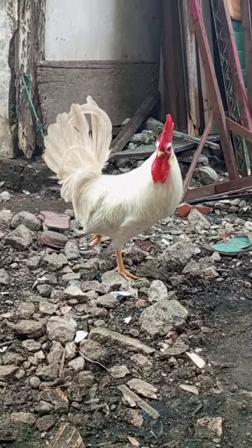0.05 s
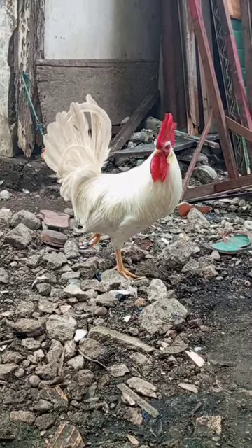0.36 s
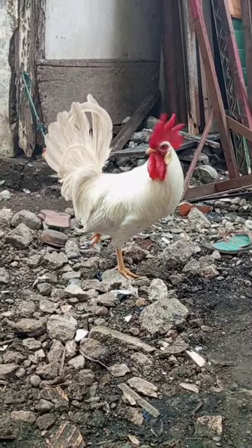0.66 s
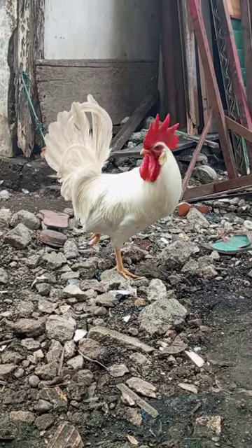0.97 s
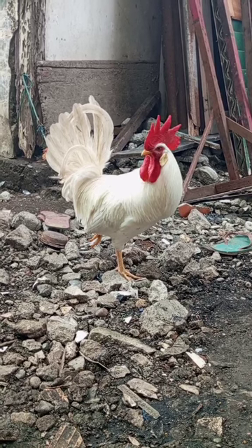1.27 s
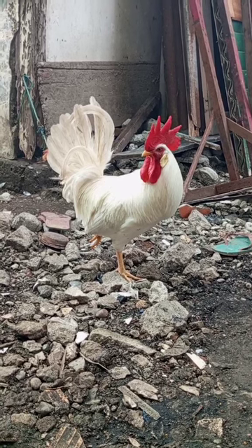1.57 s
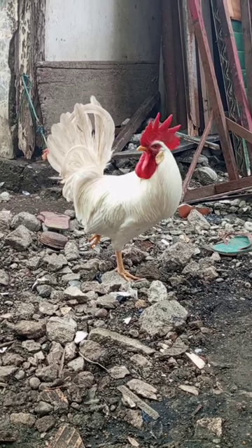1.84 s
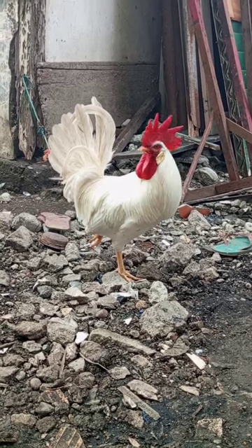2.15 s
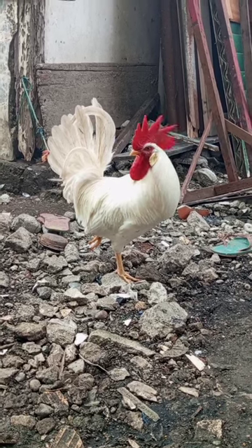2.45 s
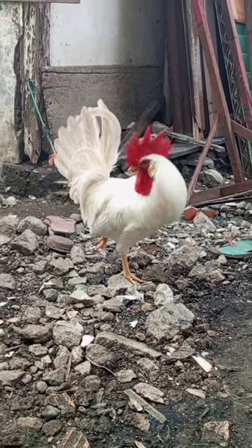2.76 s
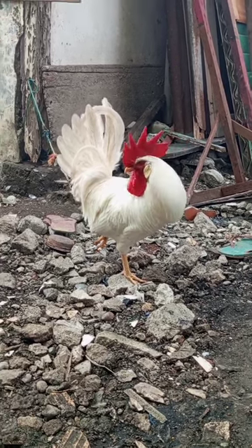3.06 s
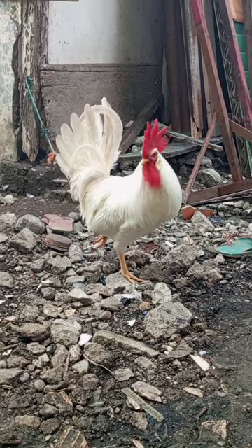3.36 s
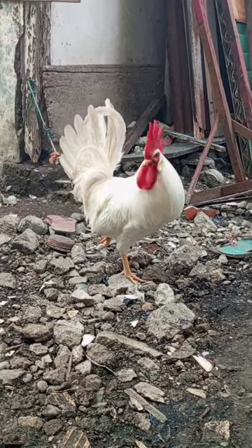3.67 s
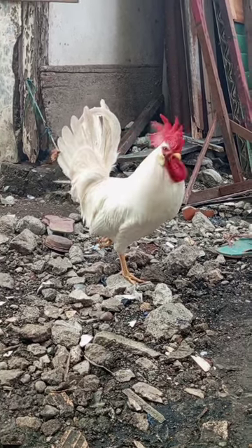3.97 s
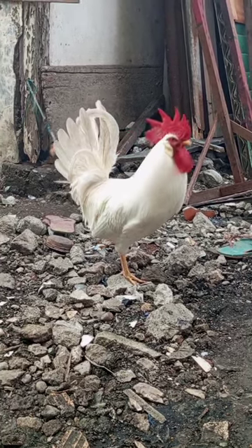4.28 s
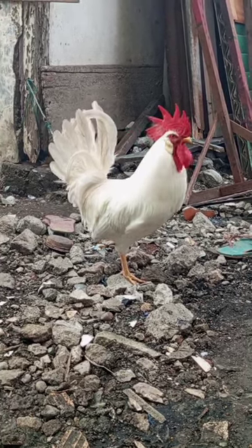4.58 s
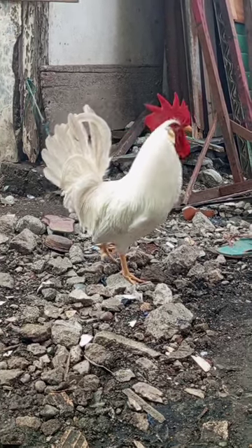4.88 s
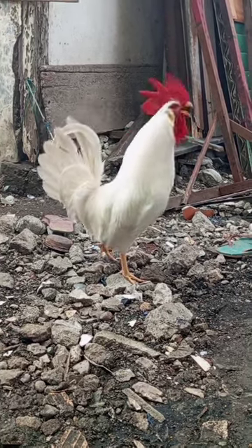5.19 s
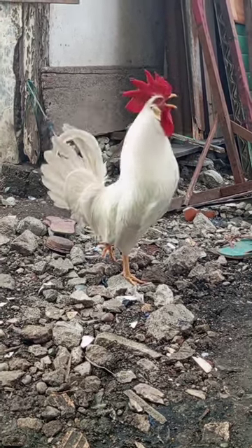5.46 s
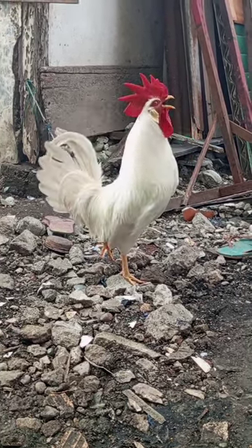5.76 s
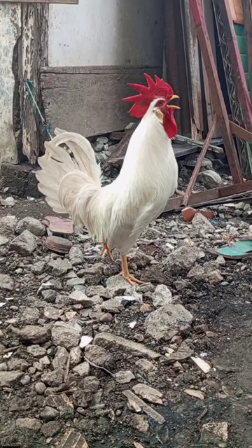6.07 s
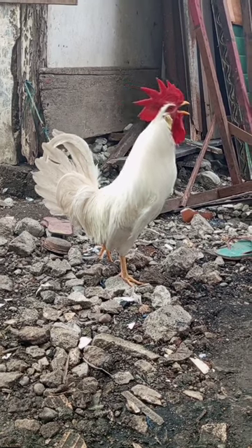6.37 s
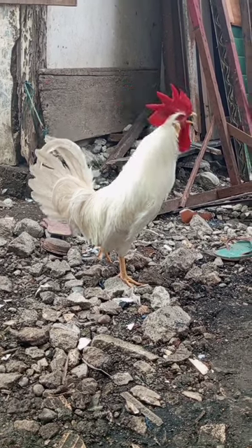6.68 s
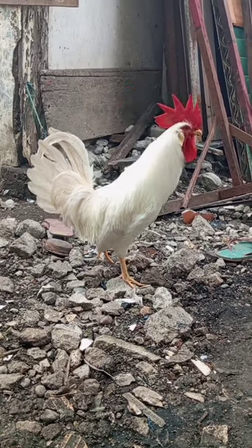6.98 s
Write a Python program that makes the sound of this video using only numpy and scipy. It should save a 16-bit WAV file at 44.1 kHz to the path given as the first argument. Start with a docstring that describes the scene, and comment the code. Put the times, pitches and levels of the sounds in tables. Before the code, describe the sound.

A rooster crows once, loud and raspy, after several seconds of faint bird chirps in a quiet yard.

```python
"""Rooster in a small walled yard

One crow from two metres: two short notes and a long falling one. The syrinx flips between a locked,
brassy tone and a chaotic rasp while the beak opens and closes; the walls ring briefly. Before it a small
bird chips, a far bird repeats a call and gravel scuffs, over an engine behind the houses and soft air."""
import sys
import numpy as np
from scipy import signal
from scipy.fft import rfft, irfft
from scipy.io import wavfile
from scipy.ndimage import uniform_filter1d

SR = 44100
rng = np.random.default_rng(int(sys.argv[2]) if len(sys.argv) > 2 else 0)


def wav_out(sig):
    """Save sig, one row per channel (or a flat mono array), as 16-bit PCM at SR to the path in sys.argv[1]."""
    wavfile.write(sys.argv[1], SR, np.round(np.clip(np.atleast_2d(sig).T, -1, 1) * 32767).astype(np.int16))


N = 314433
T = np.arange(N) / SR

# holds of the five throat and beak postures: start_s, end_s
POSTURE_HOLDS = [(5.36, 5.58), (5.68, 5.73), (5.81, 6.15), (6.3, 6.58), (6.75, 7.0)]


def rooster(attack_s=0.0073, release_s=0.023, treble_hz=4000, rasp_treble_db=-8.5, flutter_db=1.0):
    """Three syrinx notes; roughness splits each between rasp and the louder locked tone."""
    # notes: start_s, end_s, rasp_db, lock_gain_db, min_roughness (0-1)
    notes = [(5.355, 5.581, -21, 5, 0.11), (5.657, 5.732, -20.5, 6, 0), (5.784, 6.965, -20, 1.3, 0.04)]
    # pitch contour, one list per note: time_s, pitch_hz
    contours = [
        [(5.357, 736), (5.407, 685.2), (5.425, 835), (5.462, 829.2), (5.56, 865.7)],
        [(5.663, 833), (5.691, 969.3), (5.706, 976), (5.736, 871.2)],
        [(5.79, 795), (5.84, 896.1), (6.14, 876.8), (6.24, 889.8), (6.42, 899.2), (6.56, 887.9), (6.70, 865.3),
         (6.79, 832.2), (6.95, 814.7)],
    ]
    # treble share of the tone, per posture: share_db
    posture_treble_db = [-13.5, -13, -5, -1.63, -14.5]
    starts_s, _, *columns = np.transpose(notes)
    note = np.maximum(np.searchsorted(starts_s, T) - 1, 0)
    rasp_db, lock_gain_db, min_rough = [c[note] for c in columns]
    rough = roughness(min_rough)
    # breath gives out: the voice drops, fades and dulls
    collapse_s = np.maximum(T - 6.951, 0)
    drop_hz_per_s, fade_db_per_s, dull_db_per_s, floor_hz = 5500, 151, 200, 614
    hz = np.maximum(curves(np.vstack(contours))[0] - drop_hz_per_s * collapse_s, floor_hz)
    level_db = rasp_db + lock_gain_db * (1 - rough) - fade_db_per_s * collapse_s
    level_db += flutter_db * rough * wander(64)
    voice = np.sqrt(1 - rough ** 2) * locked_tone(hz, rough) + rough * rasp(hz) + membrane_whistle()
    # wider beak, more treble
    tone_treble_db = sum(w * db for w, db in zip(blend(POSTURE_HOLDS), posture_treble_db))
    share_db = rough * rasp_treble_db + (1 - rough) * tone_treble_db - dull_db_per_s * collapse_s
    share = np.clip(undb(share_db), 0, .95)
    treble = colour(voice, [(treble_hz * .93, -60), (treble_hz, 0)])
    voice = np.sqrt(1 - share ** 2) * steady(voice - treble) + share * steady(treble)
    gate = sum(np.clip((T - start_s) / attack_s, 0, 1) ** 2 * release(end_s, release_s)
               for start_s, end_s, *_ in notes)
    return band(voice * gate, 585, "high", order=8) * undb(level_db)


def roughness(rough, onset_share=.64, end_share=.48, flip_s=.014):
    """Raise the given roughness in bouts: the syrinx flips into chaos, peaks, eases and locks again."""
    # bouts of chaos: start_s, peak_s, end_s, roughness (0-1)
    bouts = [(5.35, 5.36, 5.425, .82), (5.532, 5.585, 5.63, .76), (5.65, 5.665, 5.683, .92),
             (5.721, 5.79, 5.82, .92), (5.884, 6.05, 6.328, .88), (6.657, 6.83, 6.895, .48),
             (6.964, 6.985, 7.08, .42)]
    for start_s, peak_s, end_s, depth in bouts:
        off_peak = np.interp(T, [start_s, peak_s, end_s], [1, 0, 1])
        edge_share = np.where(T < peak_s, onset_share, end_share)
        gate = np.clip(np.minimum(T - start_s, end_s - T) / flip_s + .5, 0, 1)
        rough = np.maximum(rough, depth * (1 - (1 - edge_share) * off_peak ** 2) * gate)
    return np.clip(rough, 0, 1)


def locked_tone(hz, rough, jitter=0.0019, rough_jitter=0.0192, rolloff_db=-5.5, shimmer_db=5.5):
    """Both membranes beat together: harmonics weighted by the posture of throat and beak."""
    # spectrum of each posture: harmonic, level_db
    first = [(1, 6.5), (2, 0.5), (3, 2), (4, 3), (5, -9.5), (6, -21), (7, -27), (8, -18), (9, -24.5),
             (10, -32)]
    second = [(1, -15.5), (2, -9), (3, -28), (4, -32), (5, -5.5), (6, -5.5), (7, -11), (8, -20.5), (9, -27),
              (10, -30)]
    stretched = [(1, 11.5), (2, 10), (3, -4.5), (4, 6), (5, 17), (6, 16), (7, 8), (8, 1), (9, -57),
                 (10, -6)]
    wide = [(1, -1), (2, -5), (3, -8), (4, -5), (5, -3.5), (6, -7.5), (7, -20), (8, -29), (9, -35.5),
            (10, -29.5)]
    closing = [(1, 4), (2, 6), (3, 7), (4, 1.5), (5, -19), (6, -29.5), (7, -13), (8, -10), (9, -62),
               (10, -39)]
    # faint lower vibration on the long note: time_s, pitch_hz, depth_db
    undertone_track = [(6.25, 488.4, -47), (6.32, 539.4, -31.5), (6.42, 578.7, -30.5), (6.52, 558, -28.5),
                       (6.62, 477, -27), (6.7, 418.8, -25)]
    postures_db = [np.array(p)[:, 1] for p in (first, second, stretched, wide, closing)]
    phase = 2 * np.pi * cycles(hz * (1 + (jitter + rough_jitter * rough) * wander(248)))
    weights, tone = blend(POSTURE_HOLDS), 0
    for harmonic in range(1, 18):
        db = sum(w * p[min(harmonic, 10) - 1] for w, p in zip(weights, postures_db))
        db += rolloff_db * max(harmonic - 10, 0)
        db += shimmer_db * rough * wander(38)  # membranes close unevenly
        tone += undb(db) * np.sin(harmonic * phase)
    # first note: strong and weak cycles alternate
    period_doubling = undb(-17) * weights[0] * np.sin(phase / 2 + np.pi / 4)
    under_hz, under_db = curves(undertone_track)
    undertone = undb(under_db) * np.sin(2 * np.pi * cycles(under_hz))
    return steady(tone * (1 + period_doubling + undertone)) + undertone


def rasp(hz, scatter=.09, lurch=.07, slap_spread_db=3.5, puff_gain=.37, echo_delay_s=0.000898):
    """Unlocked membranes slap at uneven intervals and strengths, each with a puff of turbulence."""
    # spectrum of each beak position: freq_hz, level_db
    beak_opening = [(210, -78), (350, -55), (502, -10), (780, -11), (1530, -13.5), (1770, -11),
                    (2500, -15.5), (2920, -28.5), (3420, -7), (3940, -20.5), (4330, -16.5), (4990, -21),
                    (6620, -20), (8250, -47.5), (15000, -55)]
    beak_open = [(350, -23), (540, -4), (740, -9), (1200, -5.5), (1600, -7.5), (2200, -4), (2750, -9.5),
                 (3250, 0), (3700, -10.5), (4500, -9), (5550, -4), (6800, -20.5), (7600, -29),
                 (15000, -47.5)]
    beak_closing = [(350, -52), (540, 9.5), (700, -7), (1400, 6.5), (1950, -10), (2450, 6), (2900, -26),
                    (3500, 4.5), (4300, -11), (5300, -42), (6100, -15), (7100, -9.5), (7900, -43.5),
                    (15000, -52)]
    # holds of those positions: start_s, end_s
    beak_holds = [(5.36, 5.7), (5.85, 6.45), (6.72, 7.0)]
    turns = cycles(hz * (1 + scatter * wander(450) + lurch * wander(70)))
    slaps = np.diff(np.floor(turns), prepend=0) * undb(slap_spread_db * np.tanh(wander(600)))
    puffs = rng.standard_normal(N) * np.exp(-(turns % 1) / 0.21)
    source = unit(slaps) + puff_gain * unit(puffs)
    # very short echo that hollows the rasp (comb filter)
    source += 0.57 * np.interp(T - echo_delay_s, T, source)
    spectra = (beak_opening, beak_open, beak_closing)
    return steady(sum(w * unit(colour(source, s)) for w, s in zip(blend(beak_holds), spectra)))


def membrane_whistle(jitter=0.0117, second_db=-5, third_db=-8):
    """One side of the syrinx breaks free and whistles at its own pitch."""
    # whistles: start_s, length_s, pitch_hz, level_db (relative to the voice)
    whistles = [(5.375, 0.037, 1367, -1), (5.782, 0.017, 1110, 5), (6.005, .04, 1150, -9),
                (6.054, 0.047, 1171, 7)]
    clock_s = cycles(1 + jitter * wander(213))
    out = 0
    for start_s, length_s, hz, db in whistles:
        phase = 2 * np.pi * hz * clock_s
        tone = np.sin(phase) + undb(second_db) * np.sin(2 * phase) + undb(third_db) * np.sin(3 * phase)
        envelope = np.sin(np.pi * np.clip((T - start_s) / length_s, 0, 1))
        out += undb(db) * envelope * unit(tone)
    return out


def yard_echoes(x, ring_db=-11, wall_db=-20, wall_delay_s=.07):
    """Near walls ring briefly; a farther wall returns one dull echo."""
    ring = reverb(x, t60_s=0.18, delay_s=0.011, cutoff_hz=6600)
    echo = band(np.interp(T - wall_delay_s, T, x), 2700, "low", order=1)
    return undb(ring_db) * ring + undb(wall_db) * echo


def small_bird(step_s=.012, pulse_depth=.6, echo_db=-3):
    """Quick chips that fall in pulsed steps, thrown back by the walls."""
    # chips: start_s, top_hz, end_hz, length_s, level_db
    chips = [(1.012, 4630, 2730, 0.045, -51), (1.737, 5460, 3770, 0.029, -54),
             (2, 4100, 3370, 0.024, -69.5), (2.811, 4580, 2800, 0.042, -58),
             (3.594, 4017, 3320, 0.033, -64), (4.856, 4610, 3090, 0.029, -54.5)]
    out = 0
    for start_s, top_hz, end_hz, length_s, db in chips:
        progress = np.clip((T - start_s) / length_s, 0, 1)
        trill = 2 * np.pi * (T - start_s) / step_s
        stairs = progress + step_s / length_s * np.sin(trill) / (2 * np.pi)  # flat at each pulse peak
        hz = top_hz + (end_hz - top_hz) * stairs
        envelope = np.sqrt(np.sin(np.pi * progress)) * (2 - progress)
        pulses = 1 - pulse_depth * np.cos(trill)
        out += undb(db) * envelope * pulses * np.sin(2 * np.pi * cycles(hz))
    return out + undb(echo_db) * reverb(out, t60_s=0.12, delay_s=0.00545, cutoff_hz=6000)


def far_bird(rise=.09, upper_hz=2345, octave_db=-13, lower_jitter=.035, upper_jitter=.017):
    """A two-voiced call, hoarse below and ringing above, heard by its echoes."""
    # calls: start_s, pitch_hz, length_s, level_db, upper_voice_db
    calls = [(0.261, 2125, 0.15, -67, 0), (.57, 2130, .086, -75, 10), (.835, 1720, 0.082, -72, 2),
             (1.144, 1960, 0.13, -78, 10), (1.425, 1730, .1, -68, -0.5), (1.752, 1694, 0.161, -62, -10),
             (2.038, 1793, 0.165, -66.5, 9.5), (2.344, 1813, 0.17, -67, 3), (2.666, 1925, 0.14, -66, 5)]

    def voice(hz):
        phase = 2 * np.pi * cycles(hz)
        return np.sin(phase) + undb(octave_db) * np.sin(2 * phase)

    out = 0
    for start_s, pitch_hz, length_s, db, upper_db in calls:
        progress = np.clip((T - start_s) / length_s, 0, 1)
        scoop = 1 - rise * (1 - progress) ** 4
        lower = voice(pitch_hz * (scoop + lower_jitter * wander(212)))
        upper = voice(upper_hz * (scoop + upper_jitter * wander(222)))
        call = lower + undb(upper_db) * np.sqrt(progress) * upper
        out += undb(db) * np.sqrt(np.sin(np.pi * progress)) * call
    return reverb(out, t60_s=.42, delay_s=.004, cutoff_hz=5000)


def engine(idle_hz=121, idle_waver=.05, idle_rumble_db=1, swell_waver=.012, swell_rumble_db=-8):
    """Only firing note and rumble carry over the houses: a low drone with swells."""
    # rumble spectrum: freq_hz, level_db
    spectrum = [(18, -53), (30, -20.5), (59, -10.5), (80, 0.5), (97, -2.5), (146, -4.5), (177, -14.5),
                (254, -21.5), (400, -36.5), (520, -57), (880, -120)]
    # drone level: time_s, level_db
    idle_level = [(0, -67.5), (1.7, -64.5), (3, -67.5), (5.3, -65), (5.5, -84), (6.6, -85), (7.0, -68.5)]
    # swells: start_s, length_s, firing_hz, level_db
    swells = [(0.558, 0.37, 90, -58), (1.17, .45, 92.4, -65), (2.263, 0.33, 94.8, -57.5),
              (2.924, 0.071, 135, -57), (3.195, 0.4, 93, -52), (3.387, 0.18, 139.4, -48),
              (3.742, .13, 150, -55), (3.565, 0.117, 96.6, -46.5), (3.755, 0.21, 99.7, -46.5),
              (3.97, .25, 100.8, -53), (4.686, 0.26, 96.2, -60.5)]
    attack_s, release_s = 0.051, 0.022
    rumble = unit(colour(rng.standard_normal(N), spectrum))
    drone = unit(np.sin(2 * np.pi * idle_hz * cycles(1 + idle_waver * wander(30))))
    out = undb(curves(idle_level)[0]) * unit(drone + undb(idle_rumble_db) * rumble)
    clock_s = cycles(1 + swell_waver * wander(37))
    for start_s, length_s, firing_hz, db in swells:
        envelope = np.clip((T - start_s) / attack_s, 0, 1) * release(start_s + length_s, release_s)
        firing = unit(np.sin(2 * np.pi * firing_hz * clock_s))
        out += undb(db) * envelope * unit(firing + undb(swell_rumble_db) * rumble)
    return out


def gravel(attack_s=0.0072, grain_db=4):
    """Short grainy rustles of loose ground."""
    # scuffs: start_s, centre_hz, decay_s, level_db
    scuffs = [(.21, 600, 0.028, -64), (1.04, 1310, 0.032, -60.5), (1.454, 600, 0.024, -55),
              (2.348, 1780, 0.021, -53.5), (2.355, 640, 0.042, -60.5), (2.35, 5700, .08, -66.5),
              (3.59, 2450, 0.045, -61), (3.63, 413, 0.25, -58), (3.734, 1460, 0.065, -57.5),
              (3.76, 405, 0.1, -58.5)]
    out = 0
    for start_s, hz, decay_s, db in scuffs:
        grains = rng.standard_normal(N) * undb(grain_db * wander(350))
        grit = unit(band(grains, [hz / 1.2, hz * 1.2], "band", order=3))
        envelope = np.clip((T - start_s) / attack_s, 0, 1) * release(start_s, decay_s)
        out += undb(db) * envelope * grit
    return out


def air(sway_db=0.77):
    """Soft hiss of the neighbourhood."""
    # hiss spectrum: freq_hz, level_db
    spectrum = [(59, -32), (100, -4.5), (155, -3.5), (279, -13), (425, -15.5), (703, -17.5), (831, -20.5),
                (1560, -18), (2180, -24), (3050, -25), (5840, -29), (11000, -46.5), (15000, -57)]
    # hiss level: time_s, level_db
    level = [(0, -68), (1.6, -65.5), (2.5, -63), (3.4, -61.5), (4.2, -60), (5.3, -60.5), (5.5, -65.5),
             (6.6, -69), (7.1, -60)]
    hiss = unit(colour(rng.standard_normal(N), spectrum))
    return hiss * undb(curves(level)[0] + sway_db * wander(21.4))


def reverb(x, t60_s, delay_s, cutoff_hz):
    """Diffuse wall echoes: convolution with decaying noise."""
    t = T[:SR]
    noise = band(rng.standard_normal(SR), cutoff_hz, "low", order=1)
    tail = noise * undb(-60 * t / t60_s) * (t > delay_s)
    return signal.fftconvolve(x, tail / np.sqrt(np.sum(tail ** 2)))[:N]


def undb(db):
    """Decibels to gain."""
    return 10 ** (np.asarray(db) / 20)


def unit(x):
    """Scale to rms 1."""
    return x / np.sqrt(np.mean(x ** 2) + 1e-18)


def steady(x):
    """Hold short-term rms at 1."""
    return x / np.sqrt(np.abs(uniform_filter1d(x ** 2, size=1100)) + 1e-12)


def cycles(rate):
    """Time integral of a rate."""
    return np.cumsum(rate) / SR


def release(from_s, decay_s):
    """1 until from_s, then exponential decay."""
    return np.exp(-np.maximum(T - from_s, 0) / decay_s)


def curves(rows):
    """Interpolate each later column over the first, time_s."""
    time_s, *columns = np.transpose(rows)
    return [np.interp(T, time_s, c) for c in columns]


def blend(holds):
    """Weight per posture: 1 while held, crossfading between."""
    return [np.interp(T, np.ravel(holds), np.repeat(row, 2)) for row in np.eye(len(holds))]


def colour(x, points):
    """Filter by an outline of freq_hz, gain_db."""
    hz, db = np.transpose(sorted(points))
    bins_hz = np.maximum(np.arange(N // 2 + 1) * SR / N, 1)
    return irfft(rfft(x) * undb(np.interp(np.log(bins_hz), np.log(hz), db)), N)


def band(x, hz, kind, order=2):
    """Butterworth filter."""
    return signal.sosfilt(signal.butter(order, np.minimum(hz, SR * .45), kind, fs=SR, output="sos"), x)


def wander(rate_hz):
    """Low-passed noise, rms 1."""
    return unit(band(rng.standard_normal(N), rate_hz, "low"))


def scene():
    """Crow and yard echoes over quiet surroundings, mono."""
    crow = rooster()
    return (crow + yard_echoes(crow) + small_bird() + far_bird() + engine() + gravel() + air())[None]


def record(dry, cutoff_hz=15550):
    """Steep low-pass on the top treble."""
    return signal.sosfilt(signal.ellip(10, .2, 80, cutoff_hz, fs=SR, output="sos"), dry)


dry = scene()
out = record(dry)
wav_out(out)
```